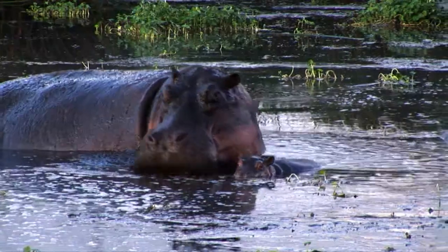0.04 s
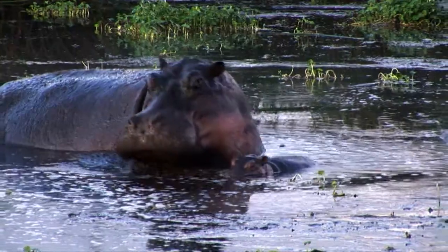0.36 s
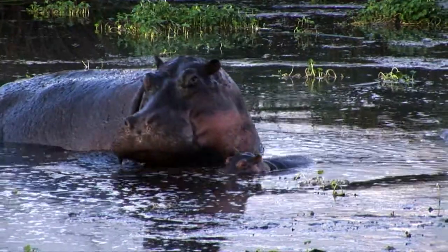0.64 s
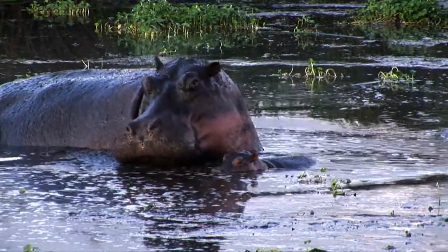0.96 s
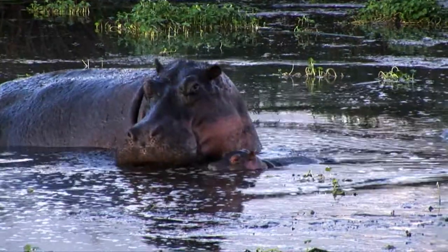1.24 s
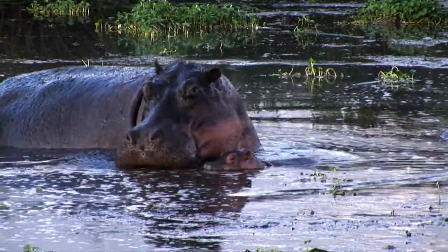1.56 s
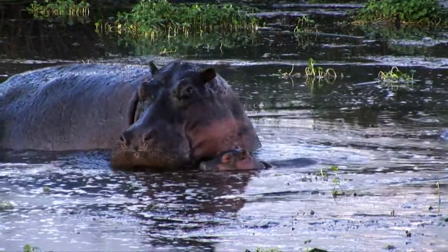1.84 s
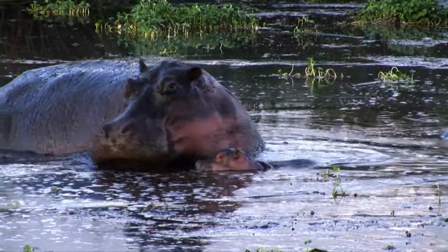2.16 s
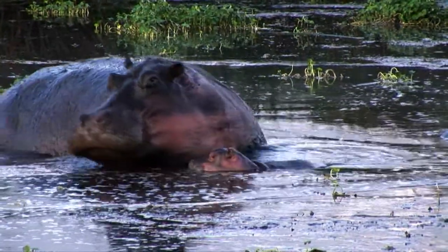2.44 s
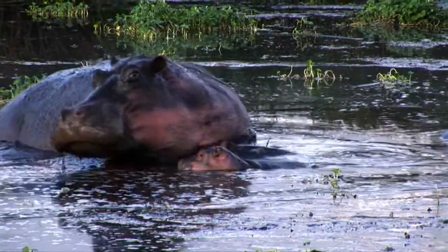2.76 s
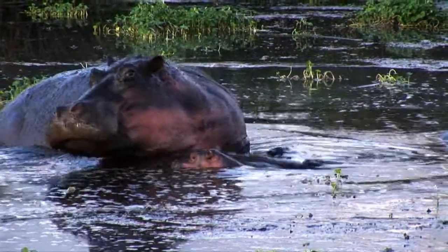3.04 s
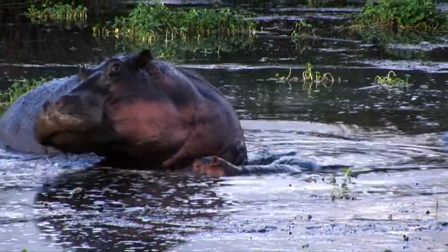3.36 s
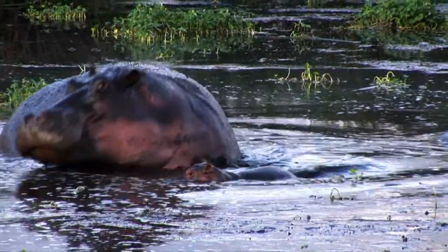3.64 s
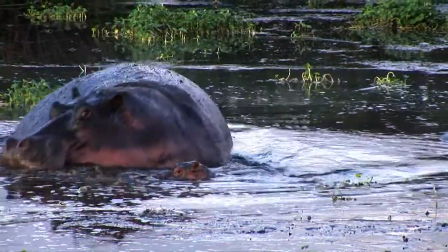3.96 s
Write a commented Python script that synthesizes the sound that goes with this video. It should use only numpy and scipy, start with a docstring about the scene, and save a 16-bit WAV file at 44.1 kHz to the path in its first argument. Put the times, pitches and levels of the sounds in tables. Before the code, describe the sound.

Water sloshes and bubbles around hippos in the open air, over soft river hush and steady insects. A bird whistles a short phrase, a hippo gives a hissing puff, and the plops thicken into a loud slap with spray.

```python
"""Hippos in a shallow pool

Two hippos shift about, and the water laps, gulps and plops as bubbles and trapped air ring.
One hippo blows at the waterline, and a slap of water that throws up spray ends the movement.
A bird whistles gliding notes from the bank while others chirp far off.
Steady insects and the soft hush of the river lie behind it all."""
import sys
import numpy as np
from scipy import signal
from scipy.fft import rfft, irfft
from scipy.io import wavfile
from scipy.ndimage import uniform_filter1d

SR = 44100
rng = np.random.default_rng(int(sys.argv[2]) if len(sys.argv) > 2 else 0)


def transcribe(signal):
    """Save signal, clipped to [-1, 1], as a 16-bit WAV file at the path in sys.argv[1]."""
    frames = np.atleast_2d(signal).T
    limited = np.clip(frames, -1, 1)
    pcm = np.round(limited * 32767).astype(np.int16)
    wavfile.write(sys.argv[1], SR, pcm)


N = 176400
T = np.arange(N) / SR

# Tone colours say how strong the low and high parts of a sound are: f/Hz, relative level/dB
RIVER_COLOUR = [(25, -17), (70, -10.5), (160, -10.5), (280, -1), (430, 5), (700, -2), (1500, -12),
                (3000, -16), (4500, -12), (8500, -21.5), (15000, -28)]
CHORUS_COLOUR = [(3800, -43), (4500, -8), (4950, 4), (5250, 5), (5650, -2), (6100, -11), (7000, -26.5),
                 (10000, -48)]
HIGH_INSECT_COLOUR = [(6500, -27), (7150, -7), (7350, -7), (7550, -25), (8200, -26)]
LAPPING_COLOUR = [(150, -30), (280, -7.5), (450, -4), (900, -3.5), (1600, -7.5), (3000, -10.5), (5000, -20),
                  (8000, -24.5), (15000, -31)]
FINE_DROP_COLOUR = [(1500, -27), (6000, -1), (15000, -9)]
RUMBLE_COLOUR = [(25, -12), (48, -31), (66, -6), (100, -7), (150, -10), (250, -1), (400, -8), (900, -60)]
CRACK_COLOUR = [(200, -28), (800, 2.5), (1450, 2), (2000, 1), (2700, 3), (4000, -1), (6000, -9),
                (9000, -19.5), (15000, -32.5)]
BREATH_COLOUR = [(150, -17.5), (400, 1), (800, 5), (1400, 2.5), (2500, -9), (4000, -11), (6500, -8.5),
                 (8500, -22), (12000, -19.5), (15000, -33)]
SLAP_SPRAY_COLOUR = [(400, -30), (1200, -6), (2000, -1), (2700, 5), (4000, 6.5), (6500, 2), (9000, -7),
                     (15000, -12)]
# How hard the water is stirred: t/s, level/dB
STIRRING = [(0, -49), (.32, -49.5), (.36, -42), (.53, -43.5), (.60, -39.5), (.68, -42.5), (.95, -49.5),
            (1.14, -51), (1.80, -55), (1.83, -40.5), (2.0, -42), (2.08, -44.5), (2.4, -50), (2.95, -47.5),
            (3.15, -43), (3.33, -46), (3.47, -35.5), (3.56, -39), (3.59, -34), (3.75, -37), (3.89, -33),
            (4.0, -36)]
# The rumble of water pushed aside: t/s, level/dB
RUMBLE_LEVEL = [(0, -72), (.7, -67), (.82, -61), (.95, -47), (1.15, -73), (2.3, -57), (2.45, -40.5),
                (2.65, -61), (2.9, -62), (3.15, -43), (3.35, -61), (3.70, -37), (3.80, -57), (4.0, -41.5)]
# Hollows filling with water: t/s, length/s, start f/Hz, end f/Hz, level/dB, place of the peak/0-1
GULP_EVENTS = [(0.101, 0.034, 423, 1230, -26.5, 0.14), (0.496, 0.035, 545, 777, -29, 0.67),
               (0.708, 0.025, 940, 1430, -34.5, 0.22), (1.787, 0.049, 253, 493, -33, 0.28),
               (1.892, 0.043, 502, 804, -32.5, 0.36), (2.719, 0.039, 730, 1160, -30.5, 0.18),
               (2.996, 0.057, 259, 336, -37, 0.28), (3.329, 0.064, 217, 272, -39, 0.64),
               (3.377, 0.058, 193, 873, -15.5, 0.78)]
# Water clapping shut against a hippo: t/s, ring f/Hz, ring level/dB, thump level/dB, crack level/dB
PLOP_EVENTS = [(.354, 930, -26, -54, -33), (.5785, 760, -31, -39, -25), (.598, 1270, -34, -56, -38),
               (.792, 730, -29, -48, -34.5), (.936, 1000, -13.5, -21.5, -23),
               (1.0045, 936, -17.5, -23, -28.5), (1.0105, 1310, -25, -54, -40), (2.199, 920, -43, -46, -33),
               (2.393, 860, -30, -27, -53), (2.422, 860, -29, -22.5, -38), (2.453, 823, -14, -24, -50),
               (2.484, 780, -15.5, -18, -29), (2.514, 955, -42, -13.5, -49), (2.523, 540, -23, -23, -42),
               (3.103, 800, -26, -17.5, -38), (3.137, 635, -25, -51, -39), (3.1733, 854, -11, -22, -23),
               (3.2368, 866, -14.5, -23, -34), (3.414, 1050, -13, -58, -24), (3.479, 1030, -22, -53, -31),
               (3.572, 850, -18.5, -21.5, -39), (3.602, 925, -17.5, -22, -31), (3.638, 790, -16, -18, -36),
               (3.696, 826, -18, -10, -26), (3.729, 860, -13, -27, -19), (3.7706, 930, -9.5, -38, -5.5),
               (3.792, 935, -45, -44, -24)]
# An air pocket's hollow ring: multiple of its pitch, relative level/dB, time to fade by 60 dB/s
POCKET_RING = [(.56, -15.5, 0.037), (1, 2, 0.013), (1.27, -16, 0.0051), (1.95, -22.5, 0.023)]
# Its low thump: f/Hz, relative level/dB, time to fade by 60 dB/s
POCKET_THUMP = [(78.5, -20.5, 0.047), (107, -30.5, 0.078), (257.3, -11.5, 0.086)]
# Single bubbles: t/s, f/Hz, level/dB, cycles to fade by 40 dB
BIG_BUBBLES = [(0.401, 383, -24, 11), (.441, 854, -31.5, 16), (.471, 546, -28, 10), (.472, 865, -30, 10),
               (.483, 516, -24, 5.8), (.516, 710, -19, 7.8), (.527, 1090, -28, 24), (.542, 924, -27.5, 28),
               (.576, 464, -24, 20), (.578, 2480, -24.5, 19), (.621, 1810, -25, 12),
               (.792, 1870, -24.5, 11), (.877, 1300, -28.5, 23), (0.9967, 1610, -10.5, 2.6),
               (1.028, 2600, -18, 12.3), (1.0643, 1064, -17, 9.4), (1.359, 2950, -27, 14),
               (1.596, 950, -31, 12), (1.816, 2510, -28.5, 14), (1.843, 2770, -35, 110),
               (1.857, 1370, -36, 43), (1.889, 2200, -24, 10), (1.919, 1650, -28, 18),
               (1.974, 2500, -29, 57), (1.998, 1115, -29, 14), (2.018, 3100, -29, 36),
               (2.029, 3300, -24, 36), (2.036, 2850, -23.5, 24), (2.842, 2310, -26.5, 35),
               (2.842, 1180, -27.5, 24), (2.853, 2780, -17.5, 9.4), (2.8528, 1020, -29.5, 22),
               (3.089, 885, -22, 5.7), (3.1385, 1530, -27.5, 22), (3.1734, 3550, -21.5, 80),
               (3.1748, 4280, -23.5, 57), (3.318, 3230, -20, 13), (3.382, 2820, -21, 21),
               (3.439, 994, -19, 16), (3.4524, 860, -6, 12), (3.471, 2920, -28, 22), (3.602, 1600, -14, 14),
               (3.608, 554, -17, 7.2), (3.625, 1960, -17, 8.8), (3.638, 600, -16, 7),
               (3.698, 450, -22.5, 17), (3.7143, 1250, -10.5, 7.5), (3.726, 501, -15.5, 22),
               (3.7698, 1200, -12, 6.4), (3.7742, 1210, -0.5, 3.9), (3.7775, 1310, -4, 4.9),
               (3.7803, 985, -6, 3.6), (3.829, 1940, -13, 8.9), (3.880, 2600, -19, 19),
               (3.8922, 502, -7.5, 8.3), (3.910, 1420, -11, 6.2), (3.9365, 746, -9, 10.3),
               (3.957, 1460, -13, 4.6)]
# Drops hitting the surface: t/s, f/Hz, peak level/dB
DROP_HITS = [(.556, 5400, -20), (.585, 6000, -29.5), (0.644, 4430, -24.5), (.751, 4340, -28),
             (1.01, 5530, -31), (1.0995, 2350, -26.5), (1.1, 4770, -22.5), (1.89, 3180, -27),
             (2.18, 3430, -35), (2.863, 4170, -28), (3.7923, 4200, -13), (3.771, 9000, -13.5),
             (3.853, 6500, -26), (3.881, 6460, -26)]
# Distant birds: t/s, length/s, start f/Hz, end f/Hz, level/dB
FAR_CHIRPS = [(1.144, 0.032, 6900, 6400, -49), (1.199, 0.026, 3940, 3650, -50),
              (1.478, 0.055, 3610, 4500, -47), (1.485, 0.057, 1960, 2280, -49),
              (1.624, 0.029, 6500, 7100, -49), (1.654, 0.062, 3690, 5120, -45),
              (1.69, 0.035, 7000, 6400, -47), (1.655, .07, 2050, 2400, -51),
              (1.717, 0.058, 2400, 2790, -51), (1.748, 0.021, 3950, 3540, -44),
              (2.484, 0.031, 2320, 2170, -34.5), (2.86, 0.086, 3700, 4460, -50),
              (3.007, 0.029, 6800, 6350, -49)]
# The pitch path of each named kind of whistle: place in the note/0-1, f/Hz
WHISTLE_SHAPES = {"dip": [(0, 3670), (.3, 3530), (.55, 3490), (1, 3560)], "flick": [(0, 3930), (.4, 3820),
                  (1, 3200)], "flat": [(0, 2740), (.12, 3090), (.3, 3136), (.76, 3065), (.9, 2760),
                  (1, 2510)], "fall": [(0, 2647), (.05, 3020), (.14, 3102), (.45, 2968), (.74, 2810),
                  (1, 2490)]}
# The whistled song: t/s, length/s, pitch ratio, level/dB, shape, loss per octave below the note's top/dB
WHISTLE_NOTES = [(1.174, .085, 1.01, -68, "dip", 10), (1.354, 0.145, 0.835, -52, "dip", 14),
                 (2.035, 0.067, 1.005, -27, "dip", 8), (2.237, 0.029, 0.93, -29.5, "flick", 10),
                 (2.267, 0.11, 1.026, -21.5, "flat", 17), (2.531, 0.25, 1.008, -21.5, "fall", 25),
                 (2.744, 0.074, 1.017, -39, "dip", 20), (2.958, 0.035, 0.93, -43.5, "flick", 15),
                 (2.985, .14, 1.083, -38.5, "flat", -4), (3.278, 0.27, 1.04, -39.5, "fall", 6)]


def from_db(db):
    """Turn decibels into a number to multiply by."""
    return 10 ** (np.asarray(db) / 20)


def rms_one(x):
    """Scale a sound to an average power of 1."""
    return x / np.sqrt(np.mean(x ** 2) + 1e-20)


def level(rows):
    """Join (time, decibels) points into a volume curve."""
    return from_db(np.interp(T, *np.transpose(rows)))


def drift(rate_hz):
    """A smooth random wobble, about 1 in size; a higher rate wobbles faster."""
    step, warm_up = 40, 2000
    pole = np.exp(-2 * np.pi * step * rate_hz / SR)
    jitter = rng.standard_normal(N // step + warm_up + 2)
    slow = signal.lfilter([1], [1, -2 * pole, pole * pole], jitter)[warm_up:]
    return np.interp(np.arange(N) / step, np.arange(len(slow)), rms_one(slow))


def coloured(x, colour):
    """Give a sound a tone colour and a power of 1."""
    hz, db = np.transpose(colour)
    bins = np.maximum(np.fft.rfftfreq(N, 1 / SR), 1)
    gain = from_db(np.interp(np.log(bins), np.log(hz), db))
    return rms_one(irfft(rfft(x) * gain, N))


def noise(colour):
    """A hiss with the given tone colour."""
    return coloured(rng.standard_normal(N), colour)


def tone(hz):
    """A pure tone that follows a pitch curve."""
    return np.sin(2 * np.pi * np.cumsum(hz) / SR)


def add(out, start, x):
    """Mix a sound in at a start time in seconds."""
    i = int(start * SR)
    out[i:i + len(x)] += x[:max(N - i, 0)]


def river():
    """The river makes a soft, even hush."""
    return from_db(-48) * noise(RIVER_COLOUR)


def insects():
    """A chorus shrills steadily while a higher insect trills about 20 times a second."""
    chorus = from_db(-48.5 + 1.13 * drift(37)) * noise(CHORUS_COLOUR)
    pulses = 1 + .8 * tone(20 + 2 * drift(7.6))
    return chorus + from_db(-64.5) * pulses * noise(HIGH_INSECT_COLOUR)


def bubble(hz, cycles, rise):
    """A bubble rings and climbs in pitch as it dies away."""
    attack_cycles = .68
    age = T[:int(1.5 * SR * cycles / hz)] * hz / cycles  # 1 once it has faded by 40 dB
    onset = 1 - np.exp(-age * cycles / attack_cycles)
    return onset * from_db(3 - 40 * age) * tone(hz * (1 + rise * age))


def lapping():
    """Stirred water sounds through countless small bubbles, a little foam and fine drops."""
    bubbles_per_s, drops_per_s, low_hz, top_hz = 2400, 70, 330, 7000
    fizz = np.zeros(N)
    for when, pitch, size, ring in rng.random((int(bubbles_per_s * N / SR), 4)):
        hz = low_hz * (top_hz / low_hz) ** pitch
        boost_db = 3.5 * min(-np.log(1 - size), 3)  # a few stand out
        add(fizz, when * N / SR, hz * from_db(boost_db) * bubble(hz, cycles=20.3 * (.5 + ring), rise=.27))
    fizz = from_db(2.5) * coloured(fizz, LAPPING_COLOUR)
    foam = from_db(-6) * noise(LAPPING_COLOUR)
    clicks = (rng.random(N) < drops_per_s / SR) * rng.standard_normal(N)
    drops = from_db(-19) * coloured(clicks, FINE_DROP_COLOUR)
    slosh = from_db(2.04 * drift(15.7))
    return level(STIRRING) * slosh * (fizz + foam + drops)


def rumble():
    """Water pushed aside by the hippos rumbles low."""
    return level(RUMBLE_LEVEL) * noise(RUMBLE_COLOUR)


def gulps():
    """A hollow shrinks as it fills, so its note climbs ever faster while it swells and fades."""
    out = np.zeros(N)
    for start, length, start_hz, end_hz, db, peak in GULP_EVENTS:
        progress = np.linspace(0, 1, int(length * SR))
        swell = from_db(db + np.interp(progress, [0, peak, 1], [-13, 0, -13]))
        soft_edges = signal.windows.tukey(len(progress), .49 * min(1, 2 * peak))
        hz = start_hz * (end_hz / start_hz) ** (progress ** 1.265)
        add(out, start, soft_edges * swell * tone(hz))
    return out


def air_pocket(tones, t):
    """Trapped air rings with a few fading tones, tuned a little differently each time."""
    rings, attack_s = np.zeros(len(t)), .0003
    for hz, db, fade_s in tones:
        hz *= 1 + .02 * rng.standard_normal()
        rings += from_db(db - 60 * t / fade_s) * np.sin(2 * np.pi * hz * t)
    return rings * (1 - np.exp(-t / attack_s))


def plops():
    """Water claps shut on a pocket of air, which rings, thumps and cracks, then bounces back once."""
    rise_s, crack_s, tail_s = .0003, .0021, .028
    rebound_s, rebound_db, low_cut_hz = .0066, -7, 62
    out, t, hiss = np.zeros(N), T[:SR // 6], noise(CRACK_COLOUR)
    decay = np.exp(-t / crack_s) + from_db(-13) * np.exp(-t / tail_s)
    burst = decay * (1 - np.exp(-t / rise_s))
    for k, (start, hz, ring_db, thump_db, crack_db) in enumerate(PLOP_EVENTS):
        tones = np.array(POCKET_RING) * [hz, 1, 1]
        ring = from_db(ring_db) * air_pocket(tones, t)
        thump = from_db(thump_db) * air_pocket(POCKET_THUMP, t)
        crack = from_db(crack_db) * burst * np.roll(hiss, k * len(t))[:len(t)]
        add(out, start, ring + thump + crack)
        add(out, start + rebound_s, from_db(ring_db + rebound_db) * air_pocket(tones, t))
    return signal.sosfilt(signal.butter(4, low_cut_hz, "high", fs=SR, output="sos"), out)


def big_bubbles():
    """The larger bubbles ring out one by one."""
    out = np.zeros(N)
    for start, hz, db, cycles in BIG_BUBBLES:
        add(out, start, from_db(db) * bubble(hz, cycles, rise=.17))
    return out


def droplets():
    """Drops hit the surface with short, bright ticks, each around its own pitch."""
    decay_s, band_ratio = .00081, 1.235
    out, t = np.zeros(N), T[:SR // 50]
    for start, hz, db in DROP_HITS:
        band = signal.butter(2, [hz / band_ratio, hz * band_ratio], "band", fs=SR, output="sos")
        tick = signal.sosfilt(band, rng.standard_normal(len(t)) * np.exp(-t / decay_s))
        add(out, start, from_db(db) * tick / np.abs(tick).max())
    return out


def far_birds():
    """Distant birds give faint, rough chirps that slide up or down."""
    out, rough = np.zeros(N), 1 + .035 * drift(150)
    for start, length, start_hz, end_hz, db in FAR_CHIRPS:
        hz = np.linspace(start_hz, end_hz, int(length * SR))
        hz *= rough[int(start * SR):][:len(hz)]
        add(out, start, from_db(db) * np.hanning(len(hz)) * tone(hz))
    return out


def whistling_bird():
    """One bird whistles a phrase of pure, slightly wavering notes and repeats it softly."""
    attack_s, release_s = .013, .015
    out, waver = np.zeros(N), 1 + .0016 * drift(55)
    for start, length, ratio, db, shape, loss_db in WHISTLE_NOTES:
        progress = np.linspace(0, 1, int(length * SR))
        path = np.interp(progress, *np.transpose(WHISTLE_SHAPES[shape]))
        hz = ratio * uniform_filter1d(path, size=400)  # round off the corners
        swell = np.clip(length * np.minimum(progress / attack_s, (1 - progress) / release_s), 0, 1)
        gain = from_db(db + loss_db * np.log2(hz / hz.max()))
        hz *= waver[int(start * SR):][:len(hz)]
        add(out, start, gain * swell * tone(hz))
    return out


def hippo_blow():
    """A hippo blows at the waterline: a rough hiss swells and stops short."""
    breath = np.interp(T, [2.49, 2.64, 2.668, 2.725], [0, 1, 1, 0])
    return breath * from_db(-28.5 + 2 * drift(60)) * noise(BREATH_COLOUR)


def slap_spray():
    """The big slap throws up spray that patters back down."""
    peak_s, rise_s, decay_s = 3.78, .021, .05
    swell = np.exp(-np.abs(T - peak_s) / np.where(T < peak_s, rise_s, decay_s))
    patter = rms_one(from_db(3.5 * drift(250)))
    return from_db(-25.5) * swell * patter * noise(SLAP_SPRAY_COLOUR)


def bank_echo(x):
    """The bank and its reeds scatter back a short, dull echo."""
    t, delay_s, fade_s = T[:SR], .008, .29
    dull_hiss = signal.lfilter([1], [1, -.6], rng.standard_normal(SR))
    tail = dull_hiss * from_db(-60 * t / fade_s) * (t > delay_s)
    return signal.fftconvolve(x, tail / np.sqrt(np.sum(tail ** 2)))[:N]


def scene():
    """Mix water and birds, their faint echo, the river and the insects into one channel."""
    water = plops() + droplets() + big_bubbles() + gulps() + lapping() + rumble()
    water += hippo_blow() + slap_spray()
    song = whistling_bird() + far_birds()
    echo = bank_echo(from_db(-23.5) * water + from_db(-22) * song)
    return (water + song + echo + river() + insects())[None]


def record(dry):
    """Clip the loudest peak and cut the highest treble."""
    treble_cut = signal.cheby2(16, 70, 16100, fs=SR, output="sos")
    return signal.sosfilt(treble_cut, np.clip(dry, -1, 1))


dry = scene()
out = record(dry)
transcribe(out)
```